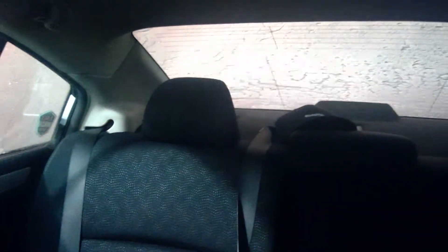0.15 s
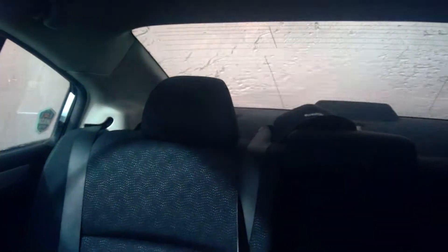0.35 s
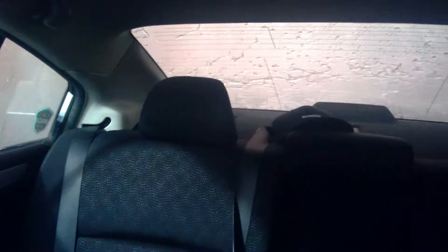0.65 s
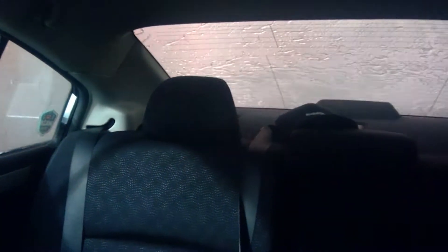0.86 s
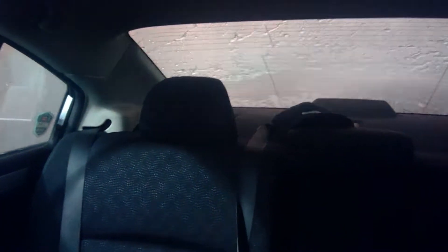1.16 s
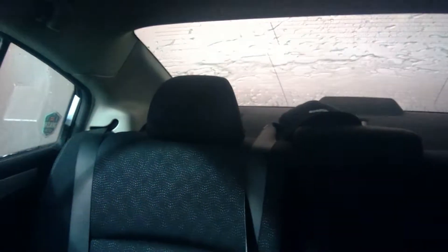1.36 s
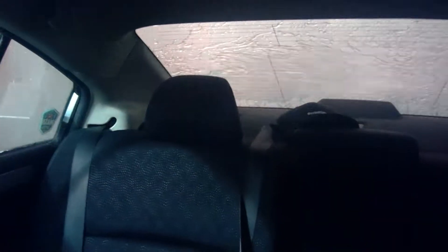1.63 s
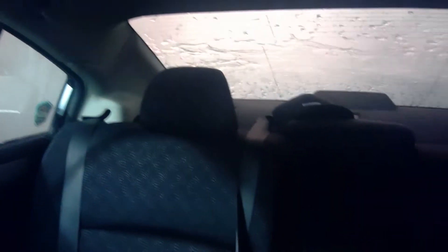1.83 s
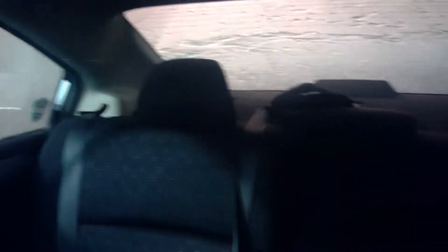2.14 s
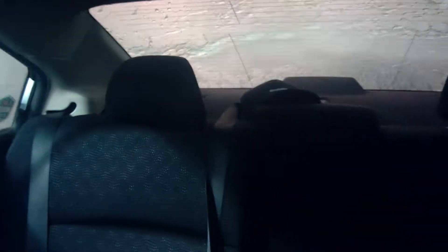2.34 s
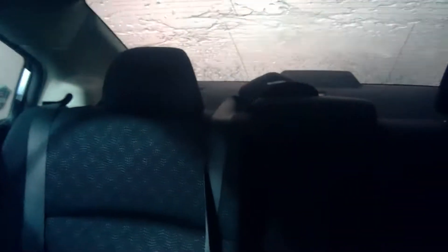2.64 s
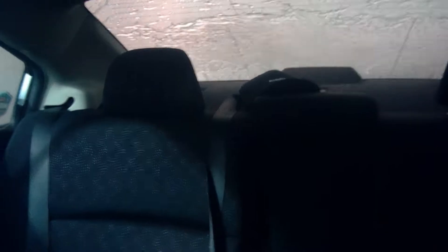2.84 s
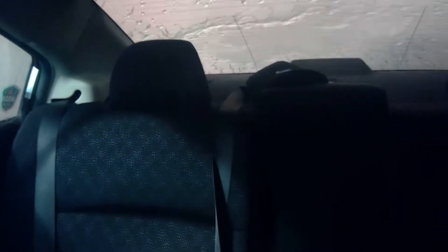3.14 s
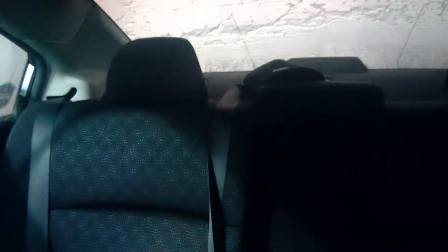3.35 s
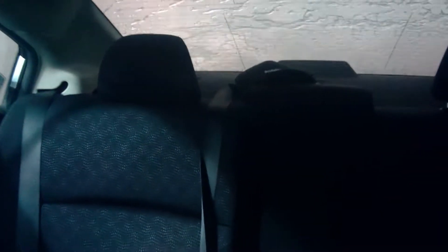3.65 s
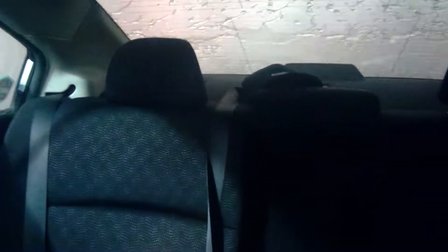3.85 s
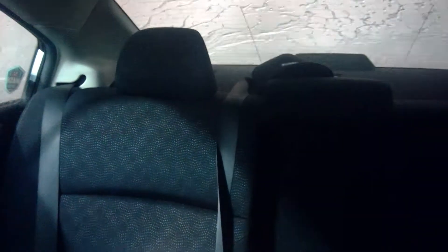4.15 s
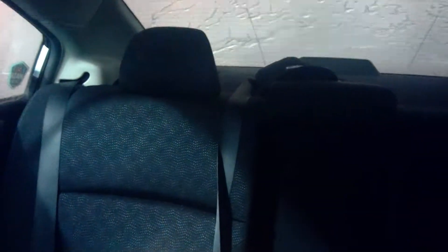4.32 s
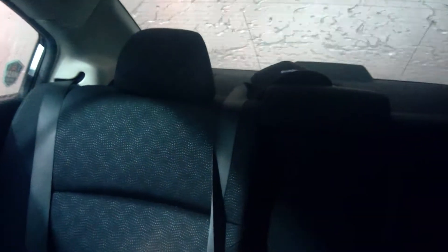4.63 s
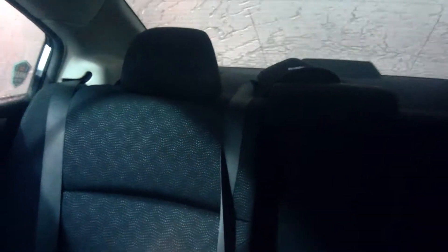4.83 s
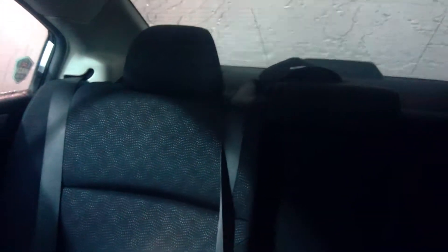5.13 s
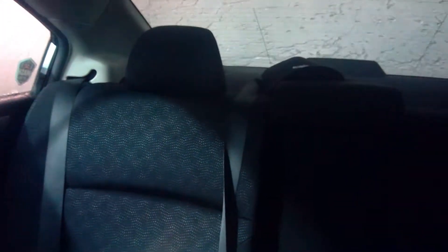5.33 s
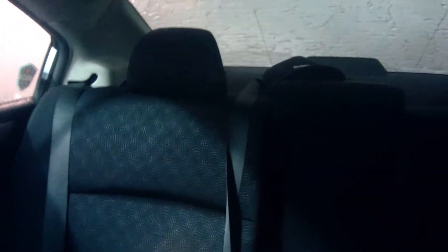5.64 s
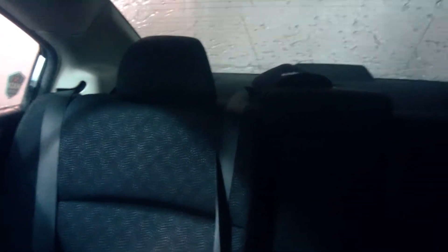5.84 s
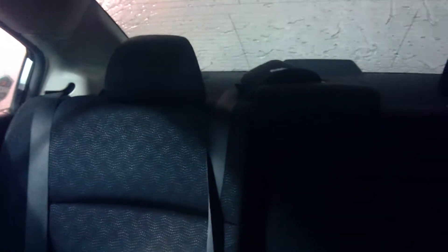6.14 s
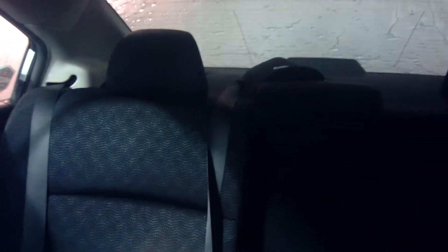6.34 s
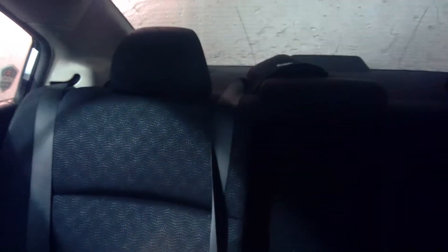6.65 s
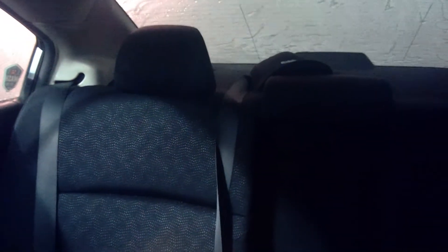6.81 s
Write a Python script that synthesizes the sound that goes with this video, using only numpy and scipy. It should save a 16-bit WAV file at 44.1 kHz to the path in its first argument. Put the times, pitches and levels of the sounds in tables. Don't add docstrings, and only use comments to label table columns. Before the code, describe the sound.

Inside a car in an automatic wash, water jets slap the windows in fast regular pulses with booming panels, then die away to near silence.

```python
import sys
import numpy as np
from scipy import signal
from scipy.fft import rfft, irfft
from scipy.io import wavfile
from scipy.ndimage import uniform_filter1d

SR = 44100
rng = np.random.default_rng(int(sys.argv[2]) if len(sys.argv) > 2 else 0)


def makeup_ratio(level_db):
    decades = np.asarray(level_db, float) / 20
    return 10 ** decades


def persist_wave(psi):
    counts = np.round(np.clip(psi, -1, 1) * 32767).astype(np.int16)
    wavfile.write(sys.argv[1], SR, np.atleast_2d(counts).T)


N = 307818

# (roof drumming [dB], incoming mist [dB], far-end mist [dB], shove on the body [dB])
SWINGS = [(-60, -53.8, -53, -34), (-55, -55, -52, -39.5), (-41.5, -53.5, -47.5, -35),
          (-34.5, -50.5, -52, -39.5), (-34, -54, -49.5, -33.5), (-34.5, -54.5, -48, -45.5),
          (-38.5, -53.5, -51.5, -32.5), (-37.3, -51, -51.5, -31), (-32.5, -54.5, -52, -41),
          (-45, -52, -53, -40.5), (-43, -57, -51.5, -37), (-57, -59, -54, -29.5), (-59, -58.5, -56, -35),
          (-67, -63.5, -64, -52), (-82, -86, -73.5, -61), (-81, -95, -84, -65), (-87, -87.9, -87.5, -68),
          (-82, -93, -83.5, -56.5), (-84, -96, -75, -62)]
# (time [s], drumming [dB], fizz [dB], dwell [s], extra left suppressor gain [dB])
OUTWARD = [(0.306, -31.5, -42.5, 0.032, 0.3), (0.704, -31, -42, .033, -0.4), (1.094, -33, -43, 0.036, -0.4),
           (1.486, -29.5, -42.5, 0.035, 5), (1.883, -31, -41.5, 0.035, 4.5),
           (2.275, -31, -43.5, 0.036, 4.5), (2.674, -31, -42.5, 0.037, -22), (3.065, -30, -44, 0.037, -16),
           (3.463, -34.5, -44, 0.039, -17.5), (3.863, -32.5, -42, 0.031, -19),
           (4.262, -34, -45, 0.034, -13), (4.641, -37.5, -51.5, 0.019, 0),
           (5.001, -56.5, -64.5, 0.037, -1.5), (5.4, -69.5, -71, 0.05, -3.5), (5.802, -67, -81, 0.032, -1),
           (6.202, -72, -83, 0.025, -2), (6.593, -83, -82.5, .024, 0.5)]
# (time [s], drumming [dB], fizz [dB], dwell [s], extra left suppressor gain [dB])
RETURN = [(0.089, -34.5, -48, 0.033, 1), (0.482, -33, -51.5, 0.036, 0.8), (0.881, -32, -47, 0.037, 0.8),
          (1.267, -30.5, -49, 0.041, 4.5), (1.673, -28.5, -47, 0.031, -2.5),
          (2.059, -31.5, -46.5, 0.037, -16), (2.46, -32, -47, 0.037, -14), (2.852, -29.5, -46, 0.038, -12),
          (3.242, -34.5, -46, 0.044, -18), (3.646, -31.5, -46.5, .033, -14),
          (4.042, -30.5, -50, 0.034, -12.5), (4.445, -35, -44.5, 0.028, -9.5), (4.84, -47, -58, 0.032, -3),
          (5.166, -72, -57.5, 0.028, -5), (5.55, -81, -67.5, 0.059, -2.5), (5.96, -77, -72.5, 0.047, -1),
          (6.366, -85, -81, 0.077, -0.5), (6.761, -83, -76, 0.03, -0.5)]
# (lower edge [Hz], upper edge [Hz])
BANDS = [
    (400, 1400),
    (1500, 3000),
    (3300, 6000),
    (8000, 15000),
]
# (frequency [Hz], level [dB per Hz])
GLASS_SPECTRUM = [(88, -21), (150, -17.5), (339, -1), (670, -4.5), (753, -3.5), (932, -6.5), (1180, -10.5),
                  (1300, -11.5), (1670, -16), (2110, -15), (3050, -21), (3780, -20), (5260, -20.5),
                  (15600, -31.5)]
# (frequency [Hz], level [dB per Hz])
MIST_SPECTRUM = [(880, -35), (1500, -22), (1750, -1.5), (1990, -0.5), (2160, -0.5), (3190, 0), (3380, 2),
                 (5010, 7.5), (7790, -8), (9380, -10.5), (10000, -13.5), (12000, -14), (15600, -18.5)]
# (frequency [Hz], level [dB per Hz])
SHEET_SPECTRUM = [(88, -21), (150, -10.5), (522, -1), (770, -2.5), (998, -7), (1180, -17.5), (1510, -23.5),
                  (1780, -26), (2500, -33), (3250, -58), (5500, -120)]
# (frequency [Hz], level [dB per Hz])
BOOM_SPECTRUM = [(45, -22.5), (68, -2.5), (80, -1), (200, 4), (400, -2.5), (700, -17), (2500, -97.5)]
# (frequency [Hz], level [dB per Hz])
SWAY_SPECTRUM = [(2, -15), (7, 5.5), (20, -11.5), (41, -0.5), (49, -10), (65, -30.5), (300, -100)]
# (time [s], level [dB])
WATER_LOAD = [(0, -49.5), (0.23, -47), (0.33, -38.5), (0.6, -42.5), (0.8, -26), (0.92, -35), (1.1, -29.5),
              (1.3, -35.5), (1.6, -33.5), (2.7, -34.5), (3.5, -40), (4.4, -40), (4.55, -49), (4.75, -46.5),
              (4.93, -54.5), (5.04, -47.5), (5.35, -61), (6.98, -66)]
# (time [s], level [dB])
ENGINE = [
    (0.0, -51),
    (1.26, -35.5),
    (1.6, -41.5),
    (3.0, -42),
    (4.6, -52),
    (6.98, -63),
]
# (frequency [Hz], width [Hz], lift [dB])
CABIN_MODES = [(78.3, 9.1, 11), (128, 10.1, 8.5), (207.5, 8, 6), (319.7, 10.2, 6.5), (411, 6.7, 6.5),
               (491.4, 13, 6), (605, 25, 5), (750, 24, 7.5), (1170.6, 39.4, 11), (1530, 21, 6.5),
               (1832, 14, 8), (3378, 68, 6.5), (3750, 51, 6.5), (4260, 87, 4), (10200, 360, -6.5),
               (12740, 400, -11)]
# (frequency [Hz], correlation [-1 to 1])
PORT_LIKENESS = [(60, 1), (260, 1), (520, 0.95), (1030, 0.81), (1720, 0.6), (2700, 0.26), (3100, -0.025),
                 (3900, -0.32), (5200, -0.31), (7000, 0.023), (15000, -0.15)]
# (frequency [Hz], level difference [dB])
PORT_LEAN = [(60, -0.5), (500, .5), (800, -1.5), (1700, 1), (2900, 0), (3900, 5.5), (5200, 1.5),
             (7700, 2.5), (11000, 5.5), (15000, 9.5)]
# (frequency [Hz], lead [rad])
PORT_LEAD = [(30, 0.08), (300, 0.172), (800, 0.1), (1600, 0.0)]
# (time [s], bass gain [dB], treble gain [dB])
LEFT_GRIP = [(1.201, 2.6, -9.3), (1.37, -4.5, -17), (2.0, -7, -20.5), (2.3, -9.5, -23.5), (2.5, -19.5, -22),
             (3.3, -17, -20), (4.1, -16.5, -17.5), (4.6, -12, -15.5), (5.0, -10, -10), (5.3, -4, -2),
             (5.8, -1.5, -1)]
# (time [s], grip [0-1])
RIGHT_GRIP = [
    (0, 0),
    (4.45, 0.35),
    (4.7, 0.22),
    (5.4, 0.38),
]
# (time [s], frequency [Hz], right level [dB], left minus right [dB])
LEAKS = [(1.485, 3820, -59, -1), (1.515, 3740, -59.5, 16), (1.69, 4000, -62, 7), (1.89, 3780, -69, -15),
         (2.076, 750, -30, -2), (3.467, 1201, -30.5, -20), (4.635, 12200, -55, -15.7),
         (4.647, 3420, -51, -13), (4.731, 2640, -66, -10.6), (4.746, 11240, -65, -23),
         (4.763, 3750, -52, -32), (4.789, 4920, -57, -29.3), (4.841, 1830, -50, -19),
         (4.844, 5680, -58, -25.6), (4.963, 3410, -68, -15.5), (5.187, 5580, -53.5, -33.6),
         (5.254, 1130, -59.5, -13.1), (5.387, 5280, -81, 13), (5.416, 3430, -71, -10),
         (5.95, 6300, -88.2, 10), (5.965, 4400, -81, 12), (6.354, 3860, -97, 15), (6.594, 4930, -86, -6),
         (6.679, 4435, -91, 15), (6.754, 4435, -81, 8)]
# (frequency [Hz], level [dB per Hz])
HALL_SPECTRUM = [(9, -35.5), (15, 5), (40, 0), (74, -19.5), (210, -16), (346, -25.5), (490, -18.5),
                 (570, -30), (1020, -35.5), (1170, -34.5), (1320, -41.5), (4400, -47), (9000, -52.5),
                 (15600, -52.5)]


def jet():
    hz, t, z = signal.stft([drops(25000, 0.77), drops(25000, 0.84)], SR, nperseg=512, noverlap=384)
    patches = field(z[0].shape, bins=2, frames=16)
    lasting = field(z.shape, bins=1, frames=70)
    shared = np.clip(1.6 - hz / 2500, 0, 1)[:, None]
    left_paths = shared * lasting[1] + np.sqrt(1 - shared ** 2) * lasting[0]
    lasting = np.array([left_paths, lasting[1]])
    flicker = evened(uniform_filter1d(rng.standard_normal(len(t)), size=4))
    wobble = makeup_ratio(2.28 * patches + 2.2 * lasting + 1.0 * flicker - 0.59)
    z = pair(z[0], z[1], hz[:, None]) * np.sqrt(jet_power(hz, t)) * wobble
    return signal.istft(suppress(z, hz, t), SR, nperseg=512, noverlap=384)[1][:, :N]


def jet_power(hz, t):
    passing, drift = mist(hz, t)
    away = np.exp(-abs((t - turns_s()[:, None] + 0.009) / 0.036) ** 2.06).max(0)
    treble = np.clip(np.log((hz + 1) / 900) / np.log(3), 0, 1)[:, None]
    shut = makeup_ratio(-11 * away * treble)
    return (glass(hz, t) ** 2 + passing ** 2) * shut ** 2 + roof(hz, t) ** 2 + drift ** 2


def glass(hz, t):
    s, *levels_db, dwell = crossings()
    rise = 0.78 - 0.26 * (s[:, None] > 4.8)
    gains_db = []
    for k, width in enumerate((0.94, 0.89, 0.97, 0.84)):
        swell = bumps(t, s, levels_db[k], width * dwell, rise)
        scale = band_scale(GLASS_SPECTRUM, hz, band=k)
        gains_db.append(20 * np.log10(swell + 1e-7) + 20 * np.log10(scale))
    return makeup_ratio(read(GLASS_SPECTRUM, hz)[:, None] + across(np.array(gains_db), hz))


def roof(hz, t):
    turn, (roof_db, _, far_db, _) = turns_s(), np.transpose(SWINGS)
    far_drum_db = far_db + 3 + 0.11 * (-51 - far_db)
    overhead = bumps(t, turn + 0.03 - 0.008, roof_db, 0.034, rise=0.29)
    far = bumps(t, turn + 0.23, far_drum_db, 0.084)
    return shape(SHEET_SPECTRUM, hz, band=0)[:, None] * (overhead + far)


def mist(hz, t):
    turn, (_, in_db, far_db, _) = turns_s(), np.transpose(SWINGS)
    air_db = np.interp(t, turn + 0.225, 4.5 - 1.06 * (turn + 0.03)) + 8.5
    air = np.clip(np.log((hz + 1) / 5000) / np.log(2), 0, 1)[:, None] * air_db
    spectrum = shape(MIST_SPECTRUM, hz, band=2)[:, None]
    swell = bumps(t, turn + 0.065, in_db, 0.038) + bumps(t, turn + 0.25, far_db, 0.063)
    drift_db = np.interp(t, turn + 0.225, far_db) - 30.5
    return spectrum * makeup_ratio(air) * swell, spectrum * makeup_ratio(air + drift_db)


def crossings():
    rows = []
    ways = [(OUTWARD, -5, -5.5, 0.11), (RETURN, -4.5, -5, -0.1)]
    for table, rattle_gain_db, sizzle_gain_db, sizzle_stays in ways:
        s, drum_db, fizz_db, dwell, _ = np.transpose(table)
        faded = np.maximum(-36.5 - fizz_db, 0)
        rattle_db = 0.58 * drum_db + (1 - 0.58) * fizz_db + rattle_gain_db - 0.13 * faded
        sizzle_db = fizz_db + sizzle_gain_db + sizzle_stays * faded
        rows.append([s, drum_db, rattle_db, fizz_db, sizzle_db, dwell])
    return np.hstack(rows)


def turns_s():
    first_s, swing_s = -0.2155, 0.3935
    return first_s + swing_s * np.arange(len(SWINGS))


def drops(per_s, spread_db):
    size = makeup_ratio(spread_db * np.minimum(rng.exponential(1, N), 5)) * rng.standard_normal(N)
    return evened(size * (rng.random(N) < per_s / SR))


def bass():
    t, slow = np.arange(N) / SR, np.arange(0, N / SR, 0.005)
    load = makeup_ratio(np.interp(slow, *np.transpose(WATER_LOAD)))
    shove = bumps(slow, turns_s() + 0.24, np.transpose(SWINGS)[-1], 0.051)
    s, drum_db, *_, dwell = crossings()
    passing = bumps(slow, s + 0.012, drum_db, 0.47 * dwell)
    boom = load + makeup_ratio(-9.5) * shove + makeup_ratio(-11) * passing
    x = noise(SWAY_SPECTRUM) * np.interp(t, slow, makeup_ratio(-8) * load + shove)
    x = x + noise(BOOM_SPECTRUM) * np.interp(t, slow, boom) * makeup_ratio(-5.0)
    x = x + engine(t)
    duck = left_duck(np.array([100.]), slow)[0]
    return x * [np.interp(t, slow, duck), np.ones(N)]


def engine(t):
    firing_hz, orders_db = 26.3, [(1, 0), (3, -28.5), (4, -14.5)]
    wander = 0.074 * evened(uniform_filter1d(rng.standard_normal(N), size=12000))
    turns = firing_hz * t + wander
    idle = sum(makeup_ratio(db) * np.sqrt(2) * np.sin(2 * np.pi * k * turns) for k, db in orders_db)
    return idle * makeup_ratio(np.interp(t, *np.transpose(ENGINE)) + 1.0)


def cabin(x):
    hz = np.fft.rfftfreq(N, 1 / SR)
    ring = 1 + sum((makeup_ratio(db) - 1) / (1 + 2j * (hz - f) / width) for f, width, db in CABIN_MODES)
    return irfft(rfft(x) * ring, N)


def left_duck(hz, t):
    s, low_db, high_db = np.transpose(LEFT_GRIP)
    low_db, high_db = (np.interp(t, s, d, left=0, right=0) for d in (low_db, high_db))
    off_glass = np.exp(-0.5 * ((t - turns_s()[:, None]) / 0.033) ** 2).sum(0)
    high_db = high_db * (1 - 0.34 * off_glass)
    at, bite_db = np.transpose(OUTWARD + RETURN)[[0, -1], :, None]
    bite_db = (bite_db * np.exp(-0.5 * ((t - at) / 0.038) ** 2)).sum(0)
    db = np.array([low_db, 1.27 * low_db, 1.23 * high_db, high_db])
    db = db + np.outer((0.089, 0.079, 2.3, 1.33), bite_db)
    return makeup_ratio(spread([150, 750, 2100, 6000], db, hz))


def suppress(z, hz, t):
    duck = left_duck(hz, t)
    right = np.interp(t, *np.transpose(RIGHT_GRIP)) * np.clip(hz / 3000, 0, 1)[:, None] ** 2
    grip = np.clip([right - 0.49 * np.log10(duck), right], 0, 1)
    streaks = np.maximum(field(z.shape, bins=2, frames=22) - 0.6, 0)
    return z * [duck, np.ones_like(duck)] * makeup_ratio(11.0 * grip * streaks - 0.7 * grip)


def leaks():
    t, out = np.arange(N) / SR, np.zeros((2, N))
    flutter = 1 + evened(uniform_filter1d(rng.standard_normal(N), size=200)) / 2
    for s, hz, db, lean_db in LEAKS:
        near = slice(round((s - 0.07) * SR), round((s + 0.065) * SR))
        tone = np.sin(2 * np.pi * hz * t[near]) * flutter[near] * bumps(t[near], s, db, 0.011)
        out[:, near] += tone * makeup_ratio(np.array([[lean_db], [0]]))
    return out


def hall():
    return makeup_ratio(-61.5) * noise(HALL_SPECTRUM)


def noise(points):
    hz = np.fft.rfftfreq(N, 1 / SR)
    a, b = rfft(rng.standard_normal((2, N)))
    x = irfft(pair(a, b, hz) * makeup_ratio(read(points, hz)), N)
    return x / np.sqrt(np.mean(x[1] ** 2))


def pair(plain, other, hz):
    same = np.clip(read(PORT_LIKENESS, hz), -1, 1)
    mixed = same * plain + np.sqrt(1 - same ** 2) * other
    left = mixed * makeup_ratio(read(PORT_LEAN, hz)) * np.exp(1j * read(PORT_LEAD, hz))
    return np.array([left, plain])


def bumps(t, at, db, width, rise=0.84):
    at, db, width = (np.reshape(v, (-1, 1)) for v in (at, db, width))
    sided = np.where(t < at, rise * width, width)
    return (makeup_ratio(db) * np.exp(-0.5 * ((t - at) / sided) ** 2)).sum(0)


def band_scale(points, hz, band):
    gain, (lo, hi) = makeup_ratio(read(points, hz)), BANDS[band]
    return 1 / np.sqrt(np.mean(gain ** 2 * (hz >= lo) * (hz < hi)))


def shape(points, hz, band):
    return makeup_ratio(read(points, hz)) * band_scale(points, hz, band)


def spread(centres_hz, levels, hz):
    share = np.array([np.interp(np.log(hz + 1), np.log(centres_hz), row) for row in np.eye(4)])
    return share.T @ levels


def across(levels, hz):
    return spread([np.sqrt(lo * hi) for lo, hi in BANDS], levels, hz)


def read(points, hz):
    f, value = np.transpose(points)
    return np.interp(np.log(hz + 1), np.log(f + 1), value)


def field(size, bins, frames):
    in_pitch = uniform_filter1d(rng.standard_normal(size), bins, axis=-2)
    return evened(uniform_filter1d(in_pitch, frames, axis=-1))


def evened(x):
    return x / np.sqrt(np.mean(x ** 2) + 1e-20)


def scene():
    return makeup_ratio(-3.0) * cabin(jet() + bass()) + leaks() + hall()


def dropouts(x):
    hz, t, z = signal.stft(x, SR, nperseg=512, noverlap=384)
    deep = np.clip(-np.log10(left_duck(hz, t)), 0, 1)
    loud = np.log(abs(z[1, hz > 3000]).mean(0))
    deep = deep * (loud > uniform_filter1d(loud, size=100) - 0.7)
    blocks = rng.random((2, len(hz) // 3 + 1, len(t) // 20 + 1))
    blocks = np.repeat(np.repeat(blocks, 3, axis=1), 20, axis=2)[:, :len(hz), :len(t)]
    right_odds = 0.02 * (hz > 9500)[:, None] + 0 * deep
    odds = np.array([0.3 * deep, right_odds]) * np.clip(hz / 5000 - 0.3, 0, 1)[:, None]
    return signal.istft(z * (blocks > odds), SR, nperseg=512, noverlap=384)[1][:, :N]


def low_pass(x):
    return signal.sosfilt(signal.butter(12, 15770, fs=SR, output="sos"), x)


def record(dry):
    fade = np.clip((N - np.arange(N)) / (0.0046 * SR), 0, 1)
    return low_pass(dropouts(dry) * fade)


dry = scene()
out = record(dry)
persist_wave(out)
```